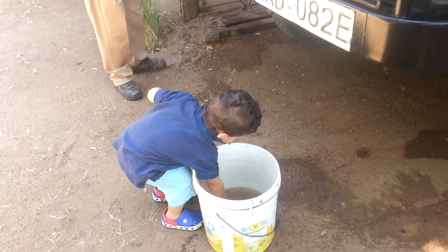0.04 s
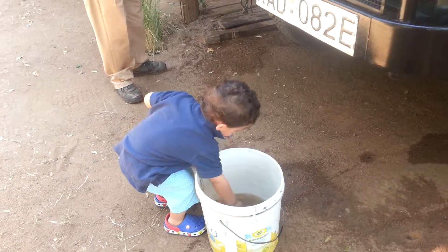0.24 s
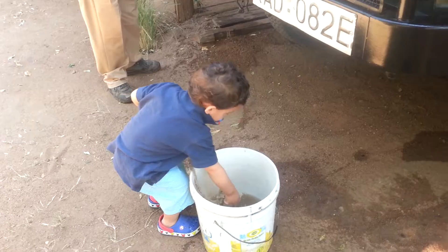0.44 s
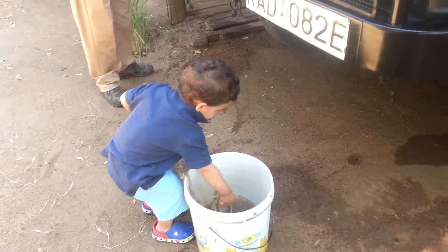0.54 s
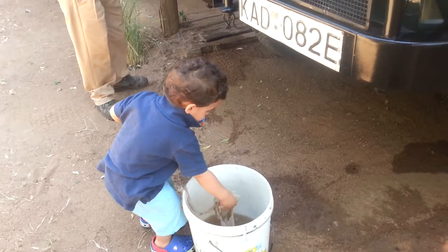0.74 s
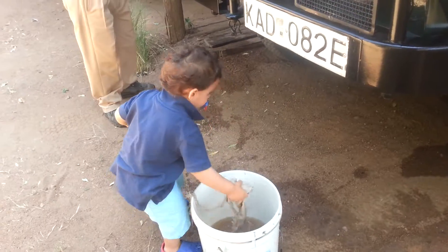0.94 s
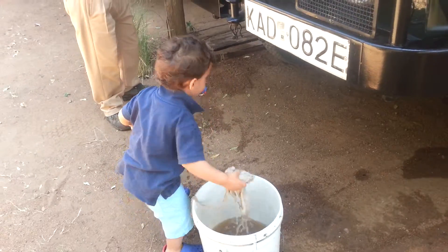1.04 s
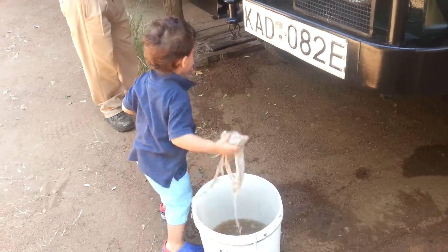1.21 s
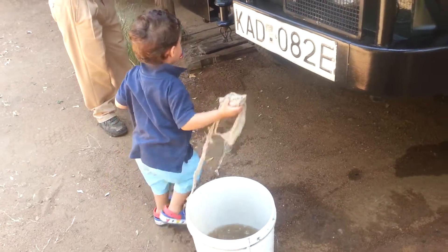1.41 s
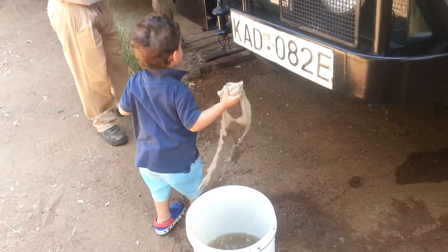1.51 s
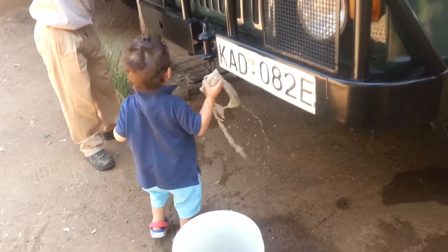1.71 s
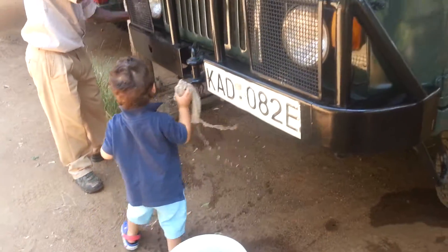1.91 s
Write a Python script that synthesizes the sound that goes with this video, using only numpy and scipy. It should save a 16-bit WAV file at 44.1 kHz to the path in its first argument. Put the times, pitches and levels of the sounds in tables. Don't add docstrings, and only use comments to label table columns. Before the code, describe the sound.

Water in a plastic bucket sloshes softly, then a rag plunges at 0.25 s with a bubbly splash. It calms until about 0.7 s, when drops plink and tick. From 1.05 to 1.5 s dripping and streaming thicken with hollow bubbles; a sharp tick and wet slap come near 1.55 s, fading by 1.8 s. Faint hiss, rumble, cricket trills, brief distant whine and a late bird chirp lie behind.

```python
import sys
import numpy as np
from scipy import signal
from scipy.fft import rfft, irfft, next_fast_len
from scipy.io import wavfile
from scipy.ndimage import uniform_filter1d

SR = 44100
rng = np.random.default_rng(int(sys.argv[2]) if len(sys.argv) > 2 else 0)


def volts_from_db(level):
    exponent = np.asarray(level, float) / 20
    return 10 ** exponent


def pcm_store(signal):
    levels = np.round(np.clip(np.atleast_2d(signal), -1, 1) * 32767)
    wavfile.write(sys.argv[1], SR, levels.astype(np.int16).T)


N = 85995

# (time [s], level [dB], treble gain [dB])
SLOSH_COURSE = [(0, -53, -4), (0.169, -59.5, -6), (.23, -47.5, -5), (.4, -54, -7.5), (.64, -61.5, 2),
                (.7, -59, 5), (.76, -60.5, 2), (0.899, -56, 2), (.97, -59.5, 4), (1.12, -54, 2),
                (1.22, -47.5, -0.5), (1.37, -49.5, -6.5), (1.5, -54.5, 3), (1.61, -47, -4.5),
                (1.71, -49.5, -3.5), (1.78, -60, 3), (1.81, -72, 0), (1.95, -81, -17)]
# (frequency [Hz], density [dB per Hz])
SLOSH_SPECTRUM = [(350, -10), (600, 0.5), (1200, -1), (1900, 4), (2900, 0.5), (3900, 0.5), (14500, -12.5),
                  (14900, -62)]
# (frequency [Hz], density [dB per Hz])
AIR_SPECTRUM = [(20, -28), (70, -15.5), (190, -3), (700, -10.5), (1300, -15.5), (4000, -23), (14500, -23),
                (14900, -76)]
# (start [s], end [s], level [dB])
CRICKET_TRILLS = [
    (0, 0.18, -72.5),
    (0.37, 0.617, -71),
    (0.696, 0.784, -67),
    (1.3, 1.398, -77),
    (1.633, 1.73, -65),
    (1.87, 1.962, -71),
]
# (start [s], level [dB], rise time [s], T60 [s])
SPLASH_BURSTS = [(0.235, -41, 0.011, 0.21), (0.255, -32.5, 0.0025, 0.035), (0.266, -41.5, 0.0081, 0.22),
                 (0.298, -44, 0.0022, 0.049), (0.31, -45.5, .002, 0.027), (0.341, -50.5, 0.0049, 0.11),
                 (0.684, -54.5, 0.03, 0.38), (.843, -59.5, .002, 0.15), (.885, -49.5, 0.0089, 0.15),
                 (1.084, -44.5, 0.0054, 0.1), (1.167, -48.5, 0.0018, 0.16), (1.26, -46, 0.0019, 0.027),
                 (1.318, -45.5, .01, 0.087), (1.41, -42, 0.0019, 0.037), (1.428, -46.5, .005, 0.043),
                 (1.566, -35.5, 0.0023, 0.092)]
# (frequency [Hz], density [dB per Hz])
SPLASH_SPECTRUM = [(680, -20), (860, -4), (2100, -4), (3000, -11.5), (4200, -11), (5500, -21),
                   (14500, -31.5), (14900, -70)]
# (time [s], peak level [dB])
DROP_IMPACTS = [(0.2454, -44), (0.2592, -32), (0.2596, -38), (.312, -37), (.3255, -45), (.385, -44),
                (.6835, -36), (0.8435, -28.5), (0.8897, -34), (.9285, -40), (1.0905, -41), (1.1164, -36),
                (1.1235, -31), (1.129, -32), (1.1667, -34), (1.1852, -38), (1.2083, -37), (1.262, -47),
                (1.3905, -47), (1.5681, -38), (1.724, -44)]
# (time [s], peak level [dB], pitch [Hz], T60 [s])
LARGE_BUBBLES = [(0.246, -32.5, 1355, 0.016), (0.259, -26.5, 1950, 0.016), (0.286, -38.5, 1430, 0.027),
                 (0.343, -38.5, 940, 0.0085), (0.387, -39.5, 1440, 0.02), (0.694, -43.5, 1325, 0.01),
                 (0.716, -45, 1980, 0.016), (0.903, -50, 1290, 0.045), (1.061, -39.5, 1127, 0.057),
                 (1.079, -38, 799, 0.046), (1.127, -44, 780, 0.051), (1.167, -41, 762, 0.11),
                 (1.185, -39, 1238, 0.055), (1.22, -42.5, 2080, 0.025), (1.2618, -34, 2220, 0.035),
                 (1.276, -39, 2230, 0.012), (1.334, -43, 2420, 0.018), (1.411, -42, 1155, 0.016),
                 (1.43, -42.5, 1145, 0.044), (1.483, -47, 1680, 0.051), (1.5655, -34.5, 1630, 0.015),
                 (1.723, -46, 724, 0.014)]
# (middle [s], peak level [dB], pitch [Hz], length [s])
AIR_POCKETS = [(0.2616, -27.5, 1220, 0.0042), (0.2754, -38, 1300, .007), (0.2771, -42, 3970, 0.0048),
               (0.28, -36, 2080, 0.0097), (0.2902, -41, 1500, 0.0069), (0.2943, -45, 1162, .008),
               (0.3015, -37, 2100, 0.0053), (0.3125, -41, 1400, 0.0044), (0.3135, -39, 2090, .004),
               (0.33, -45, 2200, .003), (0.355, -45, 2250, 0.0056), (0.398, -48.5, 1550, 0.017),
               (0.696, -47.5, 4920, 0.0048), (0.742, -47.5, 1105, .006), (0.78, -49, 3030, 0.0053),
               (0.882, -41, 3200, 0.0036), (0.888, -43, 1700, 0.0029), (0.906, -46.5, 1900, 0.0094),
               (0.931, -37.5, 3840, .008), (1.0915, -45, 3630, .005), (1.092, -40, 777, .01),
               (1.182, -39.5, 1780, .004), (1.194, -47.5, 4048, .014), (1.2114, -31.5, 3480, 0.0046),
               (1.226, -41, 3488, .004), (1.232, -42, 4940, 0.0031), (1.2634, -40, 3700, 0.0048),
               (1.2741, -39, 2010, 0.00586), (1.329, -44, 2282, 0.0048), (1.3923, -40.5, 3660, 0.0047),
               (1.4023, -43, 570, 0.0047), (1.4143, -43.5, 2210, 0.0096), (1.4196, -30.5, 1145, 0.019),
               (1.436, -42.5, 2580, .01), (1.427, -49, 2950, 0.0039), (1.5685, -35.5, 3860, 0.0036),
               (1.5699, -38.5, 4830, 0.0058), (1.5711, -30, 2057, .005), (1.575, -29, 1800, .005),
               (1.62, -49.5, 722, .012), (1.626, -47, 1846, 0.019), (1.693, -50.5, 716, .012),
               (1.846, -59, 208, 0.022)]
# (time [s], peak level [dB], pitch [Hz], left minus right [dB])
SPRAY_TICKS = [(0.3112, -37.5, 6900, -10), (0.8866, -36.5, 10900, -6), (0.9106, -30, 10200, 4),
               (1.0202, -32, 7750, -14), (1.0274, -34, 9100, 2), (1.0347, -34, 6130, 8),
               (1.0894, -30.5, 6360, 18), (1.1095, -34, 6260, 6.5), (1.1146, -29, 11750, 13),
               (1.1228, -33, 6000, 18), (1.129, -27.5, 6300, 1), (1.148, -27, 9380, -2),
               (1.2533, -32, 8850, -4), (1.268, -30, 6900, 6), (1.4116, -27, 8640, -5),
               (1.5327, -19, 10560, 7.5), (1.5364, -30, 6480, 21), (1.6082, -37, 8630, -17)]
# (time [s], peak level [dB], pitch [Hz], T60 [s])
SMALL_DROPS = [(0.4645, -50.5, 4140, 0.016), (0.4846, -47.5, 3740, 0.015), (0.6965, -38, 3810, 0.012),
               (0.844, -34, 2760, 0.015), (0.8477, -35.5, 3260, 0.0094), (0.9289, -39.5, 3730, 0.01),
               (0.9872, -43.5, 3370, 0.012), (1.0266, -44, 3510, 0.037), (1.115, -40, 3950, 0.004),
               (1.1287, -35, 4080, 0.0067), (1.1327, -30, 5000, 0.0046), (1.1528, -56, 3360, 0.011),
               (1.1667, -43, 4100, 0.011), (1.1847, -26, 3930, 0.012), (1.2085, -31, 4050, 0.013),
               (1.2259, -37.5, 4840, 0.012), (1.2332, -43.5, 3600, 0.019), (1.2534, -45.5, 4660, 0.015),
               (1.268, -29.5, 4070, 0.0072), (1.394, -38.5, 4050, 0.013), (1.4302, -40.5, 3390, 0.017),
               (1.4374, -43, 3050, 0.04), (1.4813, -43.5, 4040, 0.028), (1.51, -43.5, 3700, 0.039),
               (1.5325, -31.5, 4900, 0.015)]
# (time [s], peak level [dB], pitch [Hz], T60 [s])
HOLLOW_GULPS = [
    (1.255, -50.5, 540, 0.29),
    (1.05, -48, 840, 0.035),
]

DROP_PAN_DB, BUBBLE_PAN_DB = 2.5, 1
BUBBLE_GLIDE, BUBBLE_RISE_CYCLES = 0.022, 1.5


def level(x, db):
    return x * volts_from_db(db) / np.sqrt(np.mean(x ** 2))


def decay(t, t60):
    return np.exp(-np.log(1000) * t / t60)


def colour(x, points):
    p, n = np.array(points), next_fast_len(N)
    f = np.maximum(np.arange(n // 2 + 1) * SR / n, 1)
    gain_db = np.interp(np.log(f), np.log(p[:, 0]), p[:, 1])
    return irfft(rfft(x, n) * volts_from_db(gain_db), n)[..., :N]


def walk(rate):
    k = int(SR / rate)
    held = np.repeat(rng.standard_normal(N // k + 1), k)
    return 1.8 * uniform_filter1d(uniform_filter1d(held, k), k)[:N]


def gate(start, end):
    t = np.arange(N) / SR
    return np.clip(np.minimum(t - start, end - t) / 0.037, 0, 1)


def add(out, s, x, pan_db):
    i = max(int(s * SR), 0)
    x = x[:max(N - i, 0)]
    out[:, i:i + len(x)] += x * volts_from_db(np.array([[pan_db], [-pan_db]]) / 2)


def bubble(hz, t60, glide, rise):
    t = np.arange(int(t60 * SR) + 20) / SR
    env = (1 - np.exp(-t * hz / rise)) ** 2 * decay(t, t60)
    return env / env.max() * np.sin(2 * np.pi * hz * (t + glide * t ** 2 / t60))


def crack(hz, width, t60, noise):
    t = np.arange(len(noise)) / SR
    edges = [hz * (1 - width), min(hz * (1 + 1.5 * width), 16000)]
    band = signal.butter(2, edges, "band", fs=SR, output="sos")
    x = signal.sosfilt(band, noise * decay(t, t60))
    return x / abs(x).max()


def swarm(count, cycles, scatter_db, hiss_db, points):
    out, n = np.zeros((2, N)), next_fast_len(N)
    for when, size, strength, side in rng.random((count, 4)):
        hz = 500 * 28 ** size
        gain = volts_from_db(-scatter_db * np.log(strength + 0.00047)) * np.sqrt(hz)
        add(out, when * N / SR, gain * bubble(hz, cycles / hz, 0.13, 1.8), 9 * (side - 0.5))
    power = uniform_filter1d(abs(rfft(out[0], n)) ** 2, size=600)
    grains = irfft(rfft(out, n) / np.sqrt(power + 1e-9), n)[:, :N]
    hiss = rng.standard_normal(N) + 1.08 * rng.standard_normal((2, N))
    hiss = level(hiss * volts_from_db(0.92 * walk(39.7)), hiss_db)
    return level(colour(level(grains, 0) + hiss, points), 0)


def slosh():
    course, t = np.array(SLOSH_COURSE), np.arange(N) / SR
    wet = swarm(count=3000, cycles=16, scatter_db=1.5, hiss_db=1, points=SLOSH_SPECTRUM)
    low = signal.sosfilt(signal.butter(2, 2900, fs=SR, output="sos"), wet)
    treble_db = np.interp(t, course[:, 0], course[:, 2])
    wet = low + (wet - low) * volts_from_db(treble_db)
    return wet * volts_from_db(np.interp(t, course[:, 0], course[:, 1]) + 1.5 * walk(25))


def air():
    noise = rng.standard_normal((2, N)) + 0.42 * rng.standard_normal(N)
    return level(colour(noise, AIR_SPECTRUM), -54.5) * volts_from_db(0.5 * walk(1.3))


def cricket():
    t, pitch_hz = np.arange(N) / SR, 5891
    trill = sum(volts_from_db(db) * gate(start, end) for start, end, db in CRICKET_TRILLS)
    trill = trill * volts_from_db(0.63 * walk(52.1))
    return np.sqrt(2) * trill * np.sin(2 * np.pi * pitch_hz * t + 0.27 * walk(32))


def splashes():
    t, power = np.arange(N) / SR, 0
    for s, db, rise, t60 in SPLASH_BURSTS:
        age = np.maximum(t - s, 0)
        shape = (1 - np.exp(-age / rise)) * decay(age, t60)
        power = power + (volts_from_db(db) * shape / shape.max()) ** 2
    churn = swarm(count=5000, cycles=14, scatter_db=1.8, hiss_db=-3, points=SPLASH_SPECTRUM)
    return np.sqrt(power) * churn


def snaps():
    out = np.zeros((2, N))
    for s, db in DROP_IMPACTS:
        add(out, s, volts_from_db(db) * bubble(3200, 0.00081, 0, 0.18), DROP_PAN_DB)
    return out


def bubbles():
    out = np.zeros((2, N))
    for s, db, hz, t60 in LARGE_BUBBLES:
        ring = bubble(hz, t60, BUBBLE_GLIDE, BUBBLE_RISE_CYCLES)
        add(out, s, volts_from_db(db) * ring, BUBBLE_PAN_DB)
        add(out, s, volts_from_db(db - 14) * crack(hz, 0.25, t60, rng.standard_normal(1500)), BUBBLE_PAN_DB)
    return out


def pockets():
    out = np.zeros((2, N))
    for middle, db, hz, length in AIR_POCKETS:
        t = np.arange(int(length * SR)) / SR
        swell = np.sin(np.pi * t / length)
        add(out, middle - length / 2, volts_from_db(db) * swell * np.sin(2 * np.pi * hz * t), 1)
    return out


def ticks():
    out = np.zeros((2, N))
    for s, db, hz, pan_db in SPRAY_TICKS:
        add(out, s, volts_from_db(db - 10) * crack(hz, 0.22, 0.009, rng.standard_normal(1500)), pan_db)
        add(out, s, volts_from_db(db - 9.5) * bubble(hz, 0.0027, 0.11, 2.7), pan_db)
    return out


def drops():
    out = np.zeros((2, N))
    for s, db, hz, t60 in SMALL_DROPS:
        spatter = crack(hz, 0.2, 2 * t60, rng.standard_normal(1500))
        add(out, s, volts_from_db(db - 1) * bubble(hz, t60, 0.079, 1.0), DROP_PAN_DB)
        add(out, s, volts_from_db(db - 4) * spatter, DROP_PAN_DB)
    return out


def whine():
    phase = 2 * np.pi * 1235 * np.arange(N) / SR
    tone = np.sin(phase) + volts_from_db(-2.5) * np.sin(3 * phase)
    return np.sqrt(2) * volts_from_db(-64 + 2 * walk(23.36)) * gate(0.8, 1.25) * tone


def gulps():
    out = np.zeros((2, N))
    for s, db, hz, t60 in HOLLOW_GULPS:
        add(out, s, volts_from_db(db) * bubble(hz, t60, BUBBLE_GLIDE, BUBBLE_RISE_CYCLES), 0)
    return out


def slap():
    out, time_s, thud_db = np.zeros((2, N)), 1.566, -49
    add(out, time_s, volts_from_db(thud_db + 17) * crack(2550, 0.71, 0.083, rng.standard_normal(3000)), 0)
    add(out, time_s, volts_from_db(thud_db) * bubble(300, 0.025, 0, 0.96), 0)
    return out


def bird():
    length_s, start_hz, fall_hz = 0.036, 5950, 1400
    out, t = np.zeros((2, N)), np.arange(int(length_s * SR)) / SR
    phase = 2 * np.pi * (start_hz * t - fall_hz * t ** 2 / (2 * length_s))
    add(out, 1.812, volts_from_db(-66) * np.sin(np.pi * t / length_s) * np.sin(phase), 0)
    return out


def echoes(x, t60, wet_db, gap_s):
    t = np.arange(int(t60 * SR)) / SR
    treble = signal.butter(1, 3000, "high", fs=SR)
    apart = signal.lfilter(*treble, rng.standard_normal((2, len(t))))
    ir = (rng.standard_normal(len(t)) + 1.54 * apart) * decay(t, t60) * (t > gap_s)
    ir = ir * volts_from_db(wet_db) / np.sqrt(np.sum(ir ** 2, axis=1, keepdims=True))
    return x + signal.fftconvolve(x, ir, axes=1)[:, :N]


def ports(x):
    treble = signal.lfilter(*signal.butter(1, 3200, "high", fs=SR), x.mean(axis=0))
    late = np.roll(treble, int(0.0004 * SR))
    return x + volts_from_db(-3.5) * late * np.array([[1], [-1]])


def scene():
    struck = bubbles() + drops() + gulps() + slap() + ticks() + snaps()
    in_bucket = echoes(struck, t60=0.025, wet_db=-7, gap_s=0.00078)
    water = in_bucket + pockets() + slosh() + splashes()
    in_yard = echoes(water, t60=0.2, wet_db=-16, gap_s=0.0075)
    return ports(in_yard) + cricket() + whine() + bird() + air()


def band_limit(x):
    return signal.sosfilt(signal.butter(12, 15630, fs=SR, output="sos"), x)


def record(dry):
    lowpass = signal.ellip(6, 0.1, 50, 14750, fs=SR, output="sos")
    low = signal.sosfiltfilt(lowpass, dry)
    return band_limit(low + volts_from_db(-20) * (dry - low))


dry = scene()
out = record(dry)
pcm_store(out)
```